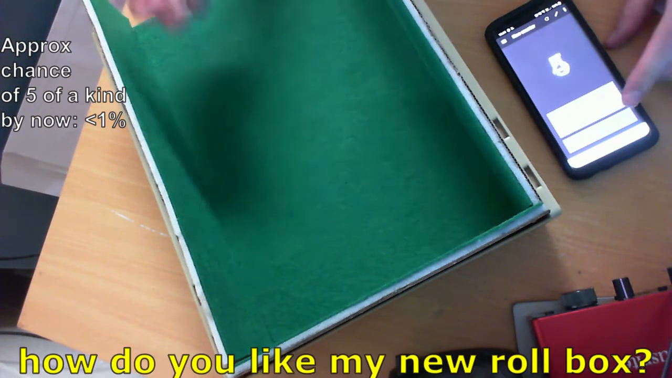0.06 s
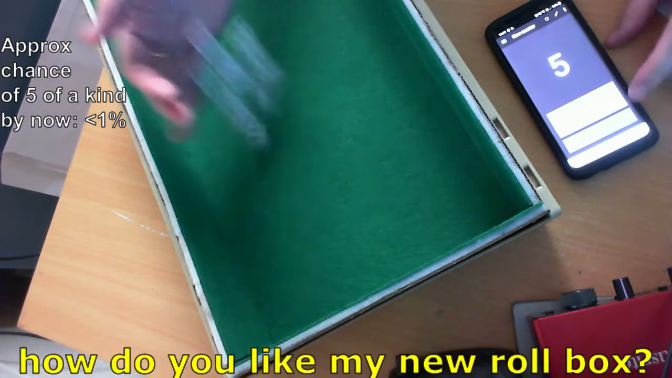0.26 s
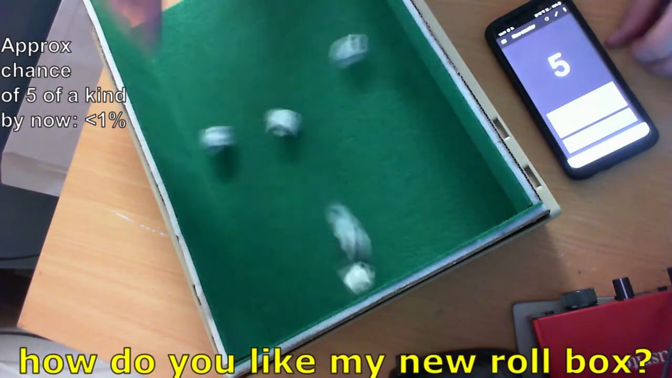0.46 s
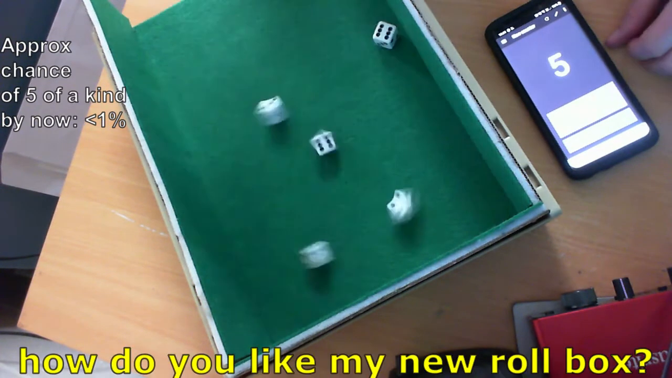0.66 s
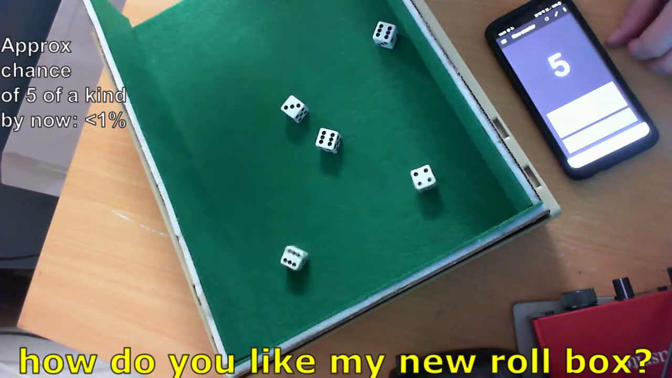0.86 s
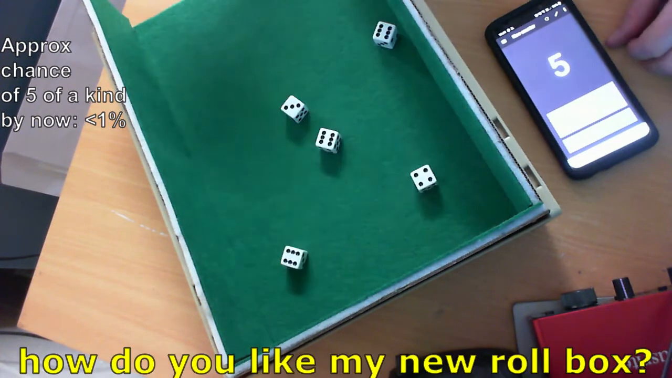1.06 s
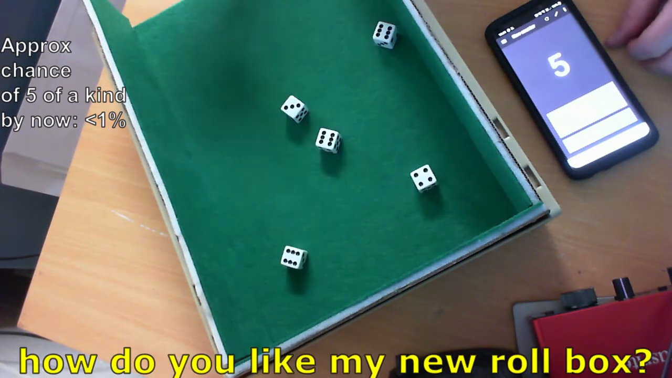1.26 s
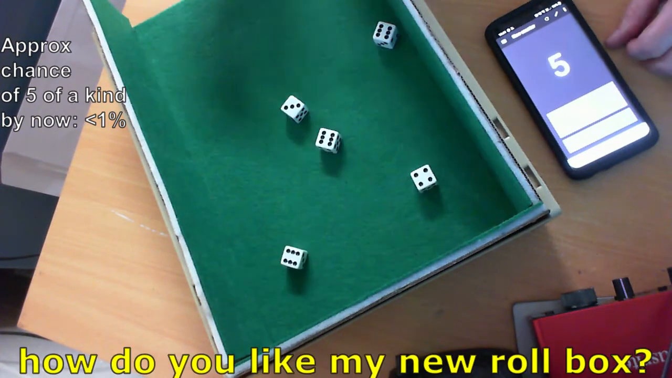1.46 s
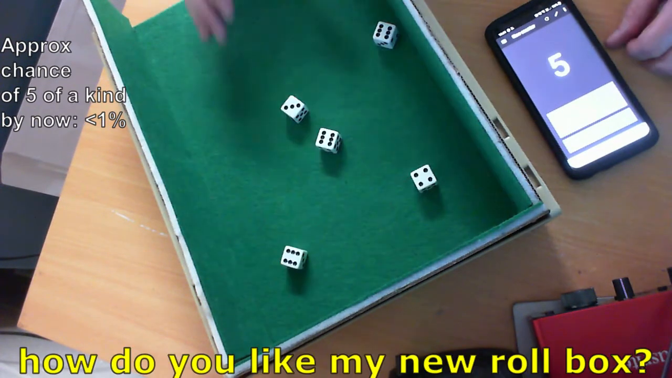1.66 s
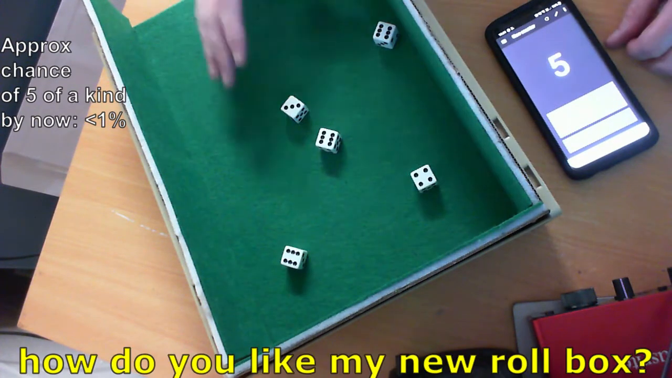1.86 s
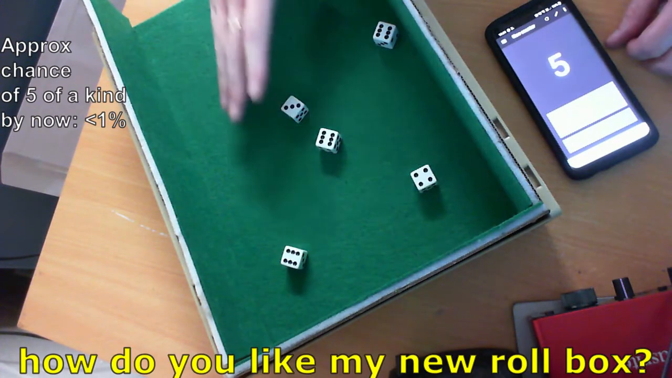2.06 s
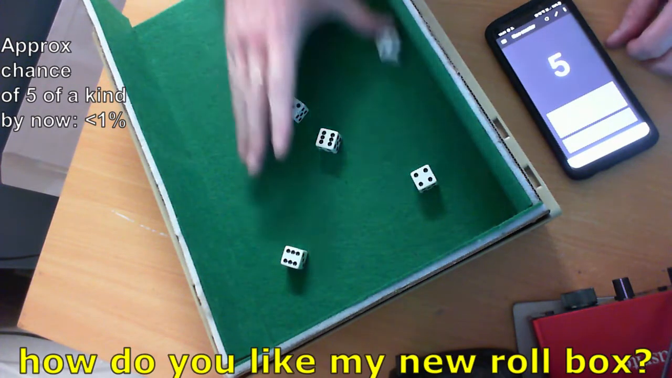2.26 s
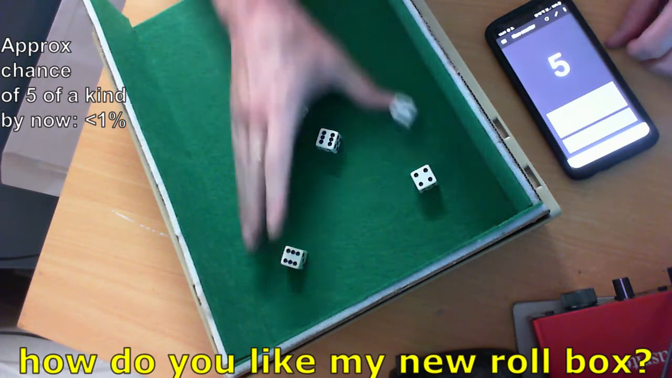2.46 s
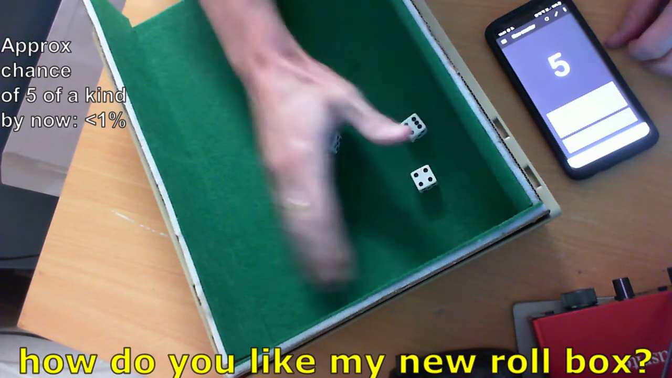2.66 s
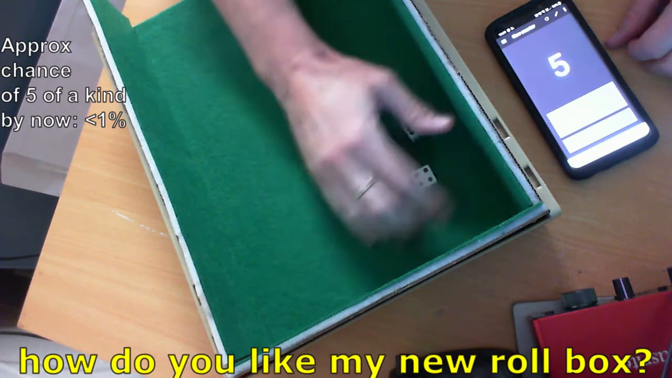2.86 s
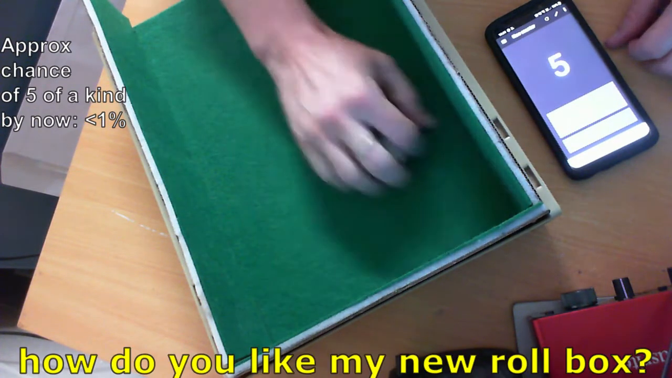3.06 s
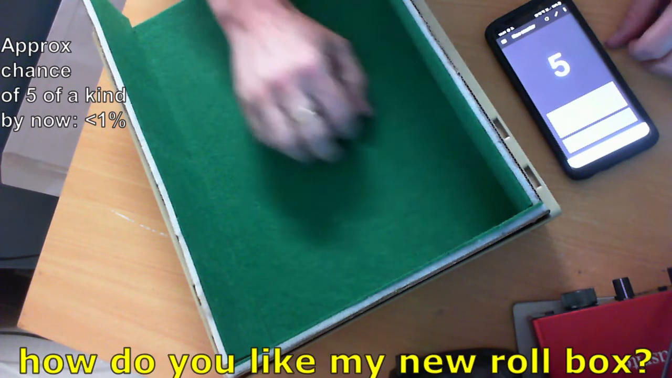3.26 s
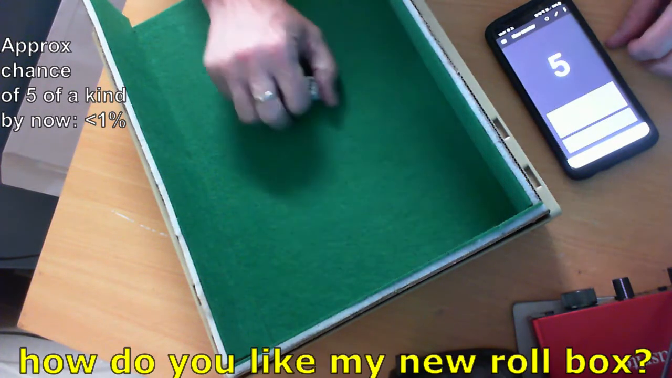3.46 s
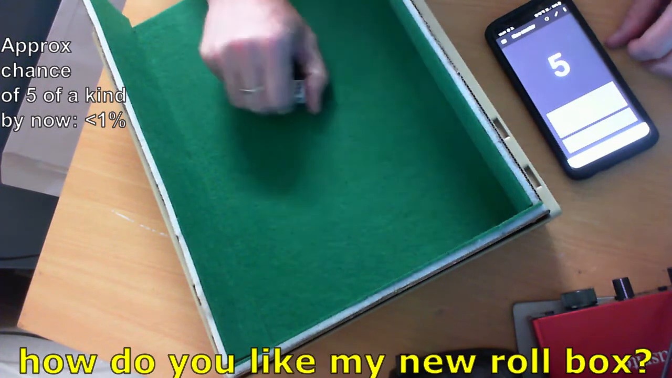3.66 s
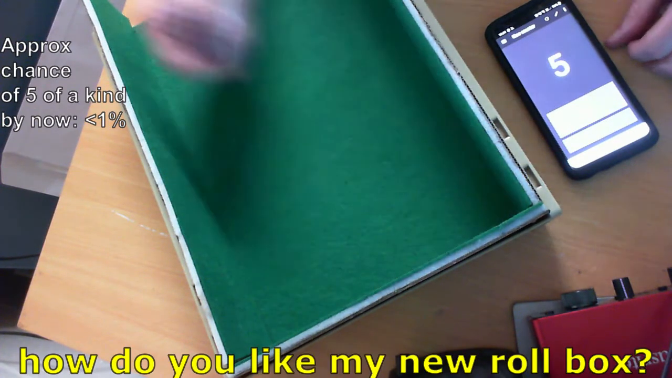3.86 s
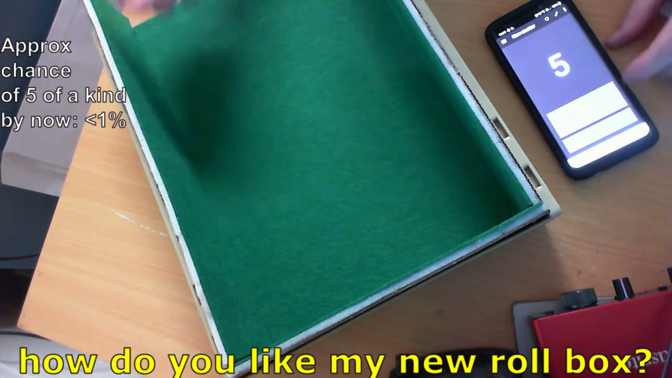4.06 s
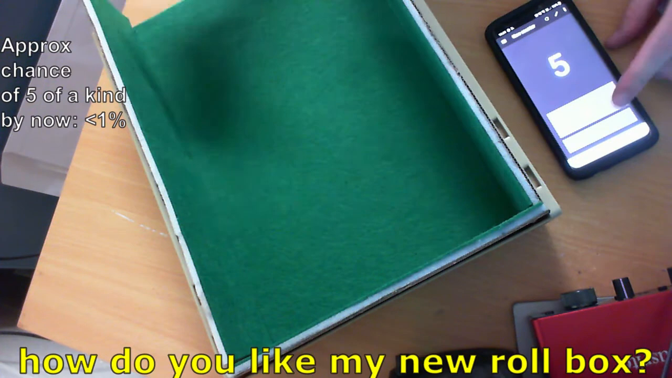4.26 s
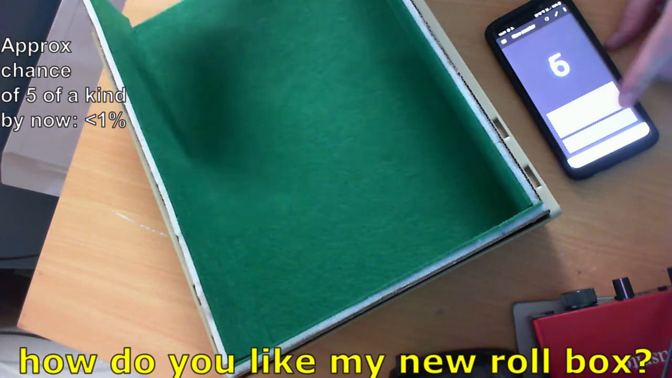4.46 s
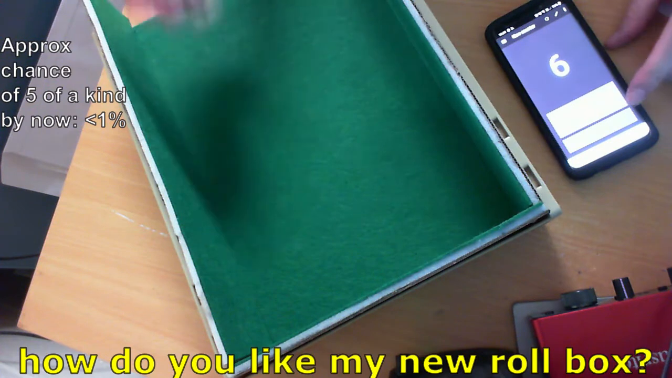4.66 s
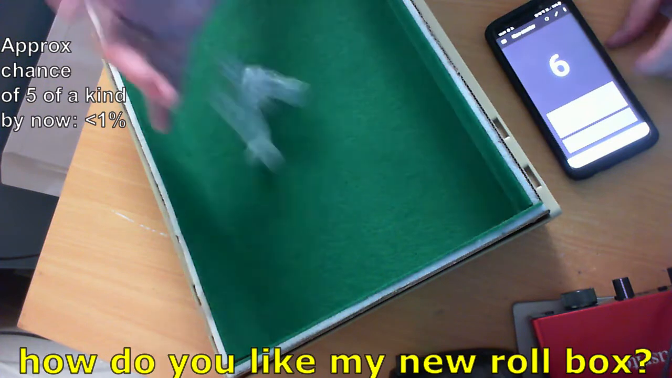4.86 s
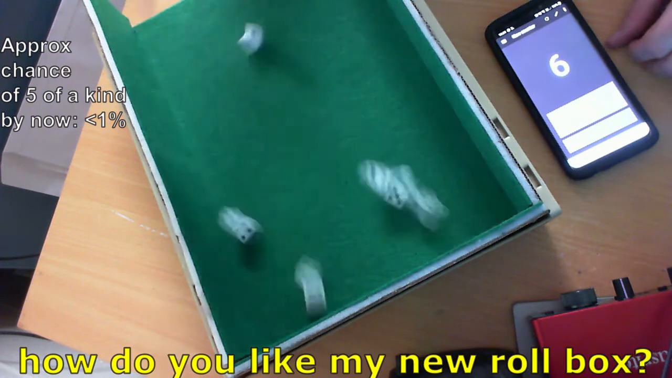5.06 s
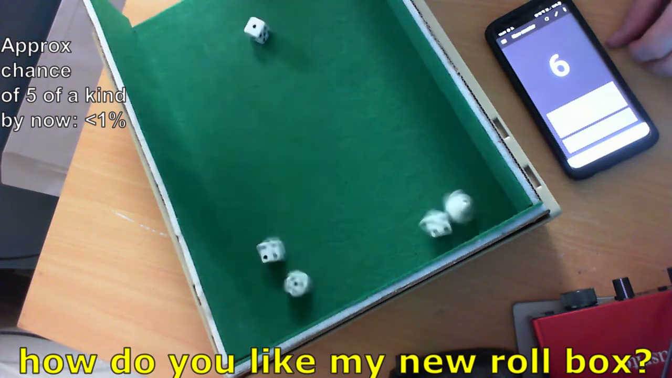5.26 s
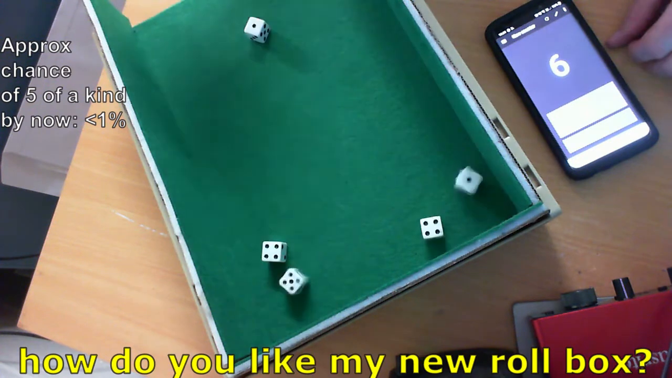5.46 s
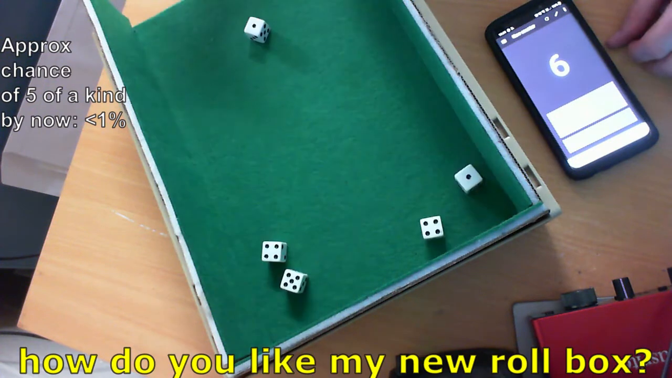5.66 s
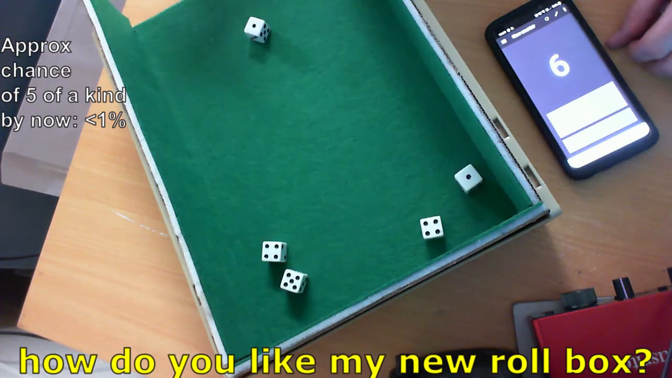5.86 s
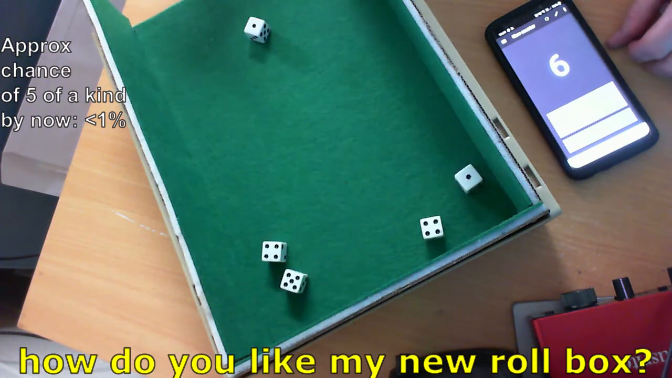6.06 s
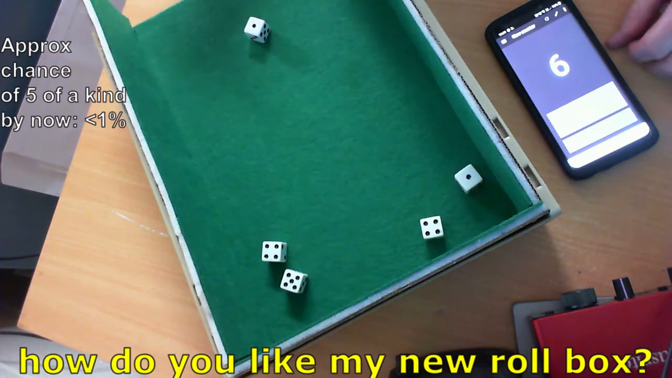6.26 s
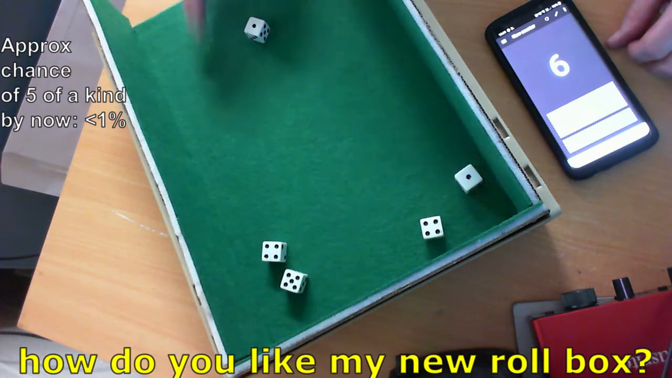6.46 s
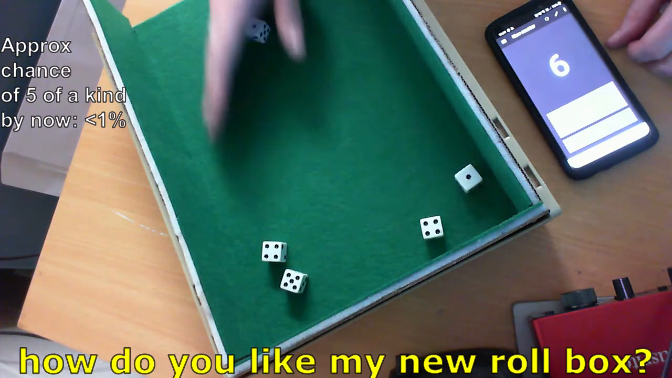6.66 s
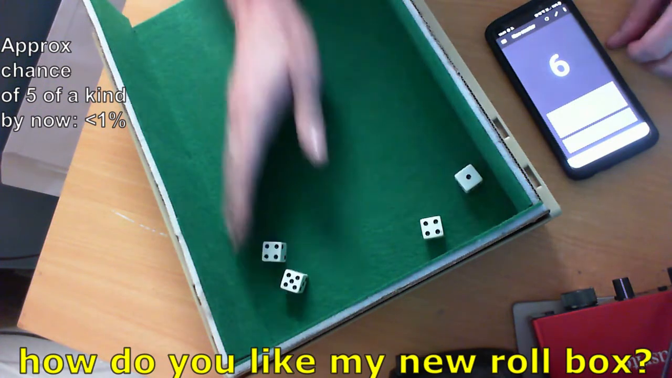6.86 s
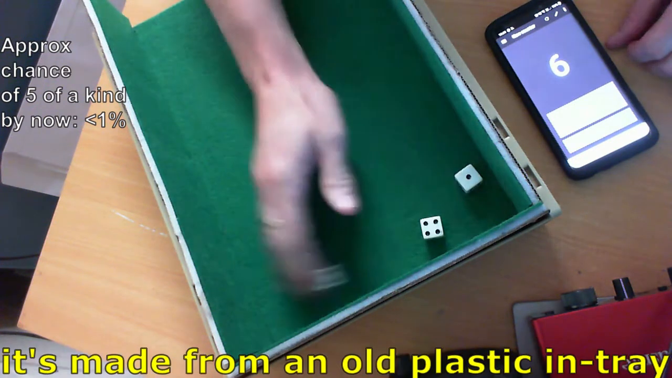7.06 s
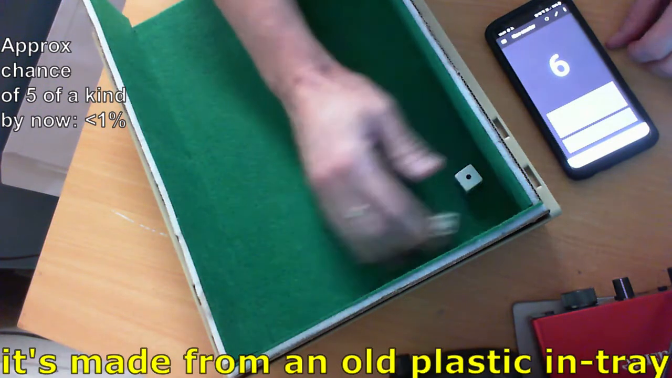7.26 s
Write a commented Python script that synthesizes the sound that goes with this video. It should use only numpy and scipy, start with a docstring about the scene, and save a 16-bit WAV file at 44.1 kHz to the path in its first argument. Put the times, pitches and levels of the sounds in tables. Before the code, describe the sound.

Close and dry at a desk: a sudden clatter of dice, bouncing knocks on a felt-covered plastic tray, then near quiet. Soft felt rubbing and light clicks follow as the dice are scooped up, then a quick rattle in the hand and a second clatter, tumbling to rest. Finally the hand slides over the felt again. Faint hiss, hum and a high pulsing electric whine run beneath, with slight room reflections.

```python
"""Plastic dice click together in a hand, are thrown twice into a felt-lined plastic tray and swept up again.
Close up, each click of a die is a tick and a short ring, with a small room answering after it.
Dice thud and tumble: knocks ring the tray's modes; hand and dice rub the felt as dense grains.
A faint rough whistle of narrow noise comes and goes. Under it all run a low hum, hiss and
steady tones, with a chopped electric whine from the recorder."""
import sys
import numpy as np
from scipy import signal
from scipy.fft import rfft, irfft, next_fast_len
from scipy.io import wavfile
from scipy.ndimage import uniform_filter1d

SR = 44100
rng = np.random.default_rng(int(sys.argv[2]) if len(sys.argv) > 2 else 0)


def persist_wave(psi):
    """Save psi, clipped to +-1, as 16-bit WAV."""
    counts = np.round(np.clip(psi, -1, 1) * 32767).astype(np.int16)
    wavfile.write(sys.argv[1], SR, np.atleast_2d(counts).T)


N = 323253
T = np.arange(N) / SR  # s

# resonances of the tray, low and upper: (f/Hz, level/dB, t60/s, held to at least 5 ms)
TRAY_BASS = [(111.2, -7, 0.7), (154, -17.5, .1), (210.4, -1.5, 0.076), (255.3, -6, 0.12), (296, -8, 0.086),
             (373.7, -4, 0.037)]
TRAY_MID = [(443, -3.5, 0.055), (475, -8.5, 0.069), (506, -6, 0.05), (585, -10.5, 0.076), (625, -9, 0.032),
            (731, -5.5, 0.099), (873, -1.5, .05), (976, 1, 0.039), (1141, 3.5, 0.033), (1251.4, 0.5, 0.038),
            (1387, 0.5, 0.036), (1513, 1.5, 0.027), (1657, -3, 0.042), (1860, -4.5, 0.021),
            (2154, -2, 0.0037), (2430, -8.5, 0.022), (2770, -9.5, 0.011)]
# colour of a die's edge scuffing the felt: (f/Hz, level/dB per Hz)
SCUFF_COLOUR = [(1200, -32), (2000, 13), (2800, -3.5), (4500, -13), (7000, -6), (10000, -24)]


def clicks(burst_s=0.00049, under_db=-13, gain_db=1.23, tick_db=-3, tick_s=0.00019):
    """Each collision is a broad tick and a millisecond of ringing in the die; the room answers each anew."""
    # die on die or on the tray wall: (t/s, level/dB before gain_db, ring f/Hz)
    hard_hits = [(0.0626, -41, 6100), (0.0725, -42, 5100), (0.102, -45, 5000), (0.1116, -33, 5200),
                 (0.1315, -26, 6000), (0.134, -33, 6100), (0.179, -23, 7500), (0.2535, -10, 7200),
                 (0.2599, -12, 6500), (0.2712, -15, 6800), (0.287, -33, 6300), (0.2983, -26, 6500),
                 (0.2998, -31, 6700), (0.313, -16, 6000), (0.4808, -15, 7000), (0.5112, -27, 6200),
                 (2.6661, -44, 5400), (2.6941, -51, 5600), (2.9466, -49, 7900), (2.9932, -45, 7400),
                 (3.0478, -36, 6800), (3.0571, -39, 6500), (3.0685, -38, 7100), (3.0869, -28, 7100),
                 (3.0956, -38, 6600), (3.1248, -21, 7500), (3.1445, -30, 7100), (3.2658, -27, 7100),
                 (3.2778, -34, 7200), (3.2878, -38, 6800), (3.3579, -38, 6000), (3.3747, -41, 6400),
                 (3.4144, -42, 6900), (3.4262, -42, 6300), (3.4351, -34, 6200), (3.437, -35, 6300),
                 (3.4782, -46, 6800), (3.8901, -42, 6000), (3.9962, -50, 5200), (4.009, -28, 5900),
                 (4.0296, -27, 6800), (4.0324, -20, 6200), (4.0375, -19, 5800), (4.0389, -24, 6500),
                 (4.0412, -23, 6400), (4.0423, -13, 6900), (4.0522, -18, 6700), (4.0562, -20, 7000),
                 (4.0604, -29, 6400), (4.0707, -28, 6500), (4.0774, -35, 5400), (4.1109, -44, 6000),
                 (4.1198, -38, 5500), (4.6944, -30, 5900), (4.728, -35, 6400), (4.7745, -33, 5900),
                 (4.7815, -28, 7000), (4.7857, -10, 6900), (4.7893, -16, 6800), (4.7914, -22, 7000),
                 (4.7949, -15, 6900), (4.8234, -16, 6900), (4.8678, -35, 5500), (4.8726, -36, 7400),
                 (4.8998, -37, 4500), (5.0113, -45, 5300), (5.2717, -35, 6200), (7.0198, -48, 6900),
                 (7.2105, -25, 7200)]
    # the softer the click, the more recoil and overtone beside the ring
    recoil_db, recoil_db_per_db = -30, 0.3133
    overtone_db, overtone_db_per_db = -25, 0.3585
    scatter_db = 5.5
    bright_db_per_khz, bright_hz = 4, 6990  # higher rings carry more overtone and tick
    die_cut_hz, die_top_hz = 1400, 13000

    out, t = np.zeros(N), T[:SR // 250]
    hits = [(*hit, 0) for hit in hard_hits] + rattle()
    shape = np.clip(t / 0.000091, 0, 1) * np.exp(-(t / burst_s) ** 3)
    rough = np.diff(rng.standard_normal((len(hits), len(t) + 1)))
    ticks = undb(tick_db) * uniform_filter1d(rough, size=3) * np.exp(-t / tick_s)
    scatter = scatter_db * rng.standard_normal((len(hits), 2))
    chances = rng.random((len(hits), 5))
    for (s, db, hz, dull_db), r, (low_db, high_db), tick in zip(hits, chances, scatter, ticks):
        bright = undb(bright_db_per_khz * (hz - bright_hz) / 1000)
        main = np.sin(2 * np.pi * hz * t)
        under = undb(under_db) * np.sin(2 * np.pi * (hz * (.65 + 0.064 * r[0]) * t + r[1]))
        over_gain = undb(overtone_db - overtone_db_per_db * db + high_db)
        over = over_gain * np.sin(2 * np.pi * ((9300 + 2200 * r[2]) * t + r[3]))
        # the whole die jumps back
        recoil_gain = undb(recoil_db - recoil_db_per_db * db + dull_db + low_db)
        recoil = recoil_gain * np.sin(2 * np.pi * (1900 + 1700 * r[4]) * t)
        ring = shape * (main + under + bright * over + recoil)
        add(out, s, room(undb(db + gain_db) * (ring + bright * tick)))
    # rounded corners dull the very top
    out = signal.sosfilt(signal.butter(2, die_top_hz, fs=SR, output="sos"), out)
    # the clicks keep no low thump
    return signal.sosfilt(signal.butter(3, die_cut_hz, "high", fs=SR, output="sos"), out)


def rattle():
    """Dice rattling together or on the tray wall: faint clicks scattered at random over each rattle."""
    # (start t/s, length/s, mean level/dB, f/Hz that each click raises 1.1 to 1.37 times, added recoil/dB)
    rattles = [(0.07, 0.013, -51, 5000, -0.5), (0.259, 0.0075, -46, 5000, -5),
               (0.256, 0.081, -34, 7030, -7), (3.05, 0.064, -42.5, 6850, 11.5),
               (3.35, 0.11, -47.5, 6300, 12), (4.02, 0.042, -34.5, 5800, -1), (4.073, .075, -49, 5400, 10),
               (4.849, .065, -40, 5160, 17)]
    r = rng.random((len(rattles), 7, 3))  # seven clicks in each
    return [(s + length * a, db + 8 * (b - .5), hz * (1.1 + 0.27 * c), dull_db)
            for (s, length, db, hz, dull_db), rows in zip(rattles, r)
            for a, b, c in rows]


def room(x):
    """An echo off the tray wall, quick ones from the desk, then a longer, weaker tail from the walls."""
    # colour of the tail, treble lifted by the microphone: (f/Hz, level/dB per Hz)
    tail_colour = [(1000, -33.5), (2500, -3.5), (4000, -4.5), (5500, -6.5), (7000, -8), (8500, -4),
                   (11000, -16.5), (15000, -30)]
    desk_db, desk_t60_s = -31, 0.032
    late_db, late_t60_s = -48.5, 0.34
    wall_s, wall_db = 0.0025, -16
    t = T[:SR // 4]
    fade = undb(desk_db - 60 * t / desk_t60_s) + undb(late_db - 60 * t / late_t60_s)
    answer = unit(colour(rng.standard_normal(len(t)), tail_colour)) * fade * np.clip(t / 0.0012, 0, 1)
    answer[0] = 1  # the direct sound
    answer[int(SR * wall_s * rng.uniform(.8, 1.2))] += undb(wall_db)
    return signal.fftconvolve(x, answer)


def thuds(reach=0.39, scatter_db=3, mid_db=-6, bass_db=-7, deep_db=-8, scuff_db=-28, skid_s=0.0028, scuff_s=0.0089):
    """A die knocks on the felt, dropped or dragged, with a brief skid: modes near the spot ring most."""
    # die or finger on tray: (t/s, level/dB, f/Hz of the modes nearest the spot, bass modes over that level/dB);
    # each part's own dB setting is added
    knocks = [(0.243, -22.5, 1010, -1.5), (0.252, -16.5, 560, -0.5), (0.26, -24.5, 1110, 4.5),
              (0.275, -25, 606, -17), (0.285, -23, 456, -16), (0.304, -18.5, 480, -3.5),
              (0.314, -19.5, 716, -35), (0.329, -23.5, 1040, -15), (0.358, -33, 1500, -0.5),
              (0.375, -27, 480, -4.5), (0.411, -36, 1180, -12), (0.423, -30.5, 1040, -16),
              (0.438, -39.5, 620, -13), (0.465, -35.5, 1050, -8), (0.483, -34, 1000, -26),
              (0.528, -46.5, 729, 3.5), (0.573, -39, 710, -5), (0.615, -30, 755, -14), (0.649, -55, 736, 6),
              (0.7, -38, 1100, -5.5), (0.743, -38, 845, -5.5), (0.781, -40, 990, -11),
              (0.811, -48, 1310, -12), (1.385, -55, 1300, -26), (2.081, -43, 1270, -37),
              (2.273, -42.5, 1460, -35), (2.36, -44, 990, -32), (3.055, -43, 1510, -19),
              (3.084, -34.5, 1540, -23.5), (3.125, -40, 1560, -28), (3.18, -42, 1480, -22),
              (3.439, -41.5, 1350, -31), (4.39, -56.5, 1180, -25), (4.785, -13.5, 1260, -15),
              (4.797, -19, 785, -4.5), (4.807, -20, 465, -16.5), (4.819, -32, 715, 0),
              (4.842, -25.5, 713, -2), (4.854, -20.5, 503, -2), (4.864, -14.5, 500, -18),
              (4.881, -15.5, 634, -3.5), (4.9, -13.5, 614, -11), (4.91, -20, 690, -14),
              (4.931, -32.5, 750, -19.5), (4.958, -27.5, 1320, -14), (4.978, -17.5, 1310, -13.5),
              (4.994, -27, 552, -4), (5.011, -35.5, 780, -10.5), (5.043, -25.5, 1270, -19),
              (5.061, -30, 1540, -19.5), (5.087, -30, 694, -13), (5.108, -33, 1310, -3),
              (5.137, -32, 820, -14), (5.151, -29, 820, -11), (5.197, -36.5, 980, -27),
              (5.238, -35, 1546, -3), (5.289, -39, 1160, -16), (5.333, -43.5, 960, -16),
              (5.378, -56, 1182, -24), (5.398, -30.5, 1240, -20), (5.454, -51, 1158, 1),
              (6.384, -53, 1150, -26), (6.755, -36, 1080, -30), (7.21, -49, 1550, -6)]
    out, bass, mid = np.zeros(N), rings(TRAY_BASS), rings(TRAY_MID)
    octaves, t = np.log2(np.array(TRAY_MID)[:, 0]), T[:SR // 25]
    skids = rng.standard_normal((len(knocks), len(t)))
    chances = rng.standard_normal((len(knocks), len(bass) + len(mid)))
    for (s, db, hz, low_db), r, skid in zip(knocks, chances, skids):
        g = np.sign(r) * undb(scatter_db * np.abs(r))  # uneven mode strengths
        near = np.exp(-((octaves - np.log2(hz)) / reach) ** 2) + 0.28
        knock = signal.fftconvolve((g[len(bass):] * near) @ mid, skid * np.exp(-t / skid_s))
        add(out, s, undb(db + mid_db) * knock / np.abs(knock).max())
        boom = g[1:len(bass)] @ bass[1:] + undb(deep_db) * g[0] * bass[0]
        add(out, s, undb(db + low_db + bass_db) * boom)
        scuff = unit(colour(skid, SCUFF_COLOUR)) * np.exp(-t / scuff_s)
        add(out, s, undb(db + scuff_db) * scuff)
    return out


def tumble():
    """Corners and edges patter on the felt while the dice roll."""
    # dice landing and rolling on: (landing t/s, rolling/s, strength/dB, scuff of edges over it/dB)
    rolls = [(0.25, 0.609, -42, -24), (4.785, .05, -42.5, -16.5), (4.849, 0.644, -41.5, -24)]
    land_s, settle_s = .03, 0.082
    # rolling slows down: each part's start over the throw (dB) and fade (dB per s)
    patter_part, boom_part, deep_part = (-10.5, 23), (-2, 34.4), (-4, 24)
    scuff_fade = 70.5  # dB per s

    def fading(s, length, db, fade_db):
        """A swell that also loses fade_db a second from its start."""
        return swell(s, length, land_s, settle_s) * undb(db - fade_db * np.clip(T - s, 0, None))

    patter, boom, deep = (sum(fading(s, length, db + over_db, fade_db) for s, length, db, _ in rolls)
                          for over_db, fade_db in (patter_part, boom_part, deep_part))
    scuff = sum(fading(s, length, db + edge_db, scuff_fade) for s, length, db, edge_db in rolls)
    knocks, corners = grains(300, 3.6), grains(700, 2.5)
    upper = patter * tray(corners, TRAY_MID) + scuff * unit(colour(corners, SCUFF_COLOUR))
    return upper + boom * tray(knocks, TRAY_BASS[1:]) + deep * tray(knocks, TRAY_BASS[:1])


def rub():
    """Fibres catch and let go: dense knocks into the tray, a rasp and a patchy hiss."""
    # hand and dice sliding on felt: (start t/s, length/s, scrape level/dB, then over the scrape:
    # rasp/dB, hiss/dB, weight on the tray floor/dB)
    strokes = [(1.914, 0.063, -59.5, -14, -9, -4.5), (2.006, 0.11, -66, -9.5, -9.5, -2),
               (2.169, .07, -73, -0.5, -10, -28), (2.257, .05, -60.5, -14, -19, -24),
               (2.319, 0.084, -59.5, -7.5, -11, -18), (2.437, 0.23, -61, -12.5, -12, -14),
               (2.7, .17, -63, -8, -11.5, -14), (2.894, 0.14, -60, -10, -14, -16),
               (3.034, .13, -56.5, -17, -10.5, -18), (3.179, .27, -59.5, -9.5, -7, -6),
               (3.458, 0.055, -65, -8, -5, -15), (3.569, 0.079, -65.5, -8, -7.5, -23),
               (3.873, 0.063, -80.5, 3, 5.5, -6), (6.255, 0.071, -79.5, -10, 3, -5),
               (6.471, 0.029, -56.5, -9.5, -10.5, -20), (6.516, 0.2, -58, -16, -13, -18),
               (6.723, .12, -56.5, -11.5, -13.5, -14), (6.851, 0.34, -59, -12.5, -12.5, -13),
               (7.197, .2, -64, -8.5, -21, -1.5)]
    # duller rasp of skin on felt: (f/Hz, level/dB per Hz)
    skin_colour = [(1400, -9.5), (2100, 2), (2600, 0), (3300, -1), (4500, -24.5)]
    # felt hiss, treble lifted by the microphone: (f/Hz, level/dB per Hz)
    felt_colour = [(2500, -8.5), (4000, 3), (5200, 1), (7000, 3), (9000, -6.5), (12000, -47.5)]
    attack_s, release_s = 0.019, 0.057
    upper_db = -2  # share of the upper tray modes
    scrape, rasp, hiss, weight = sum(
        swell(s, length, attack_s, release_s) * undb(db + np.array([0, *over]))[:, None]
        for s, length, db, *over in strokes)
    upper = np.clip(undb(upper_db + 1. * walk(12)), 0, .92)
    knocks = grains(1500, 1.0)
    ring = np.sqrt(1 - upper ** 2) * slid(knocks, TRAY_MID[5:9]) + upper * slid(knocks, TRAY_MID[9:])
    skin = unit(colour(grains(2500, 1.8), skin_colour)) * undb(3.7 * walk(30))
    fibres = unit(colour(grains(7700, 1.1), felt_colour)) * undb(2.1 * walk(25))
    felt = scrape * undb(1.7 * walk(18)) * ring + rasp * skin + hiss * fibres
    felt *= undb(1.3 * walk(40))
    pressed = tray(grains(800, 6.2), TRAY_BASS + TRAY_MID[:5])
    return felt + weight * undb(3.4 * walk(14)) * pressed


def whistle():
    """A faint rough whistle: noise in one narrow resonance, fluttering."""
    # (start t/s, length/s, level/dB)
    whistles = [(1.683, 0.18, -72), (3.958, .04, -73), (4.122, 0.056, -72), (6.473, .17, -72.5)]
    peak_hz, width_hz = 4990, 170  # width of each of two passes
    attack_s, release_s = 0.017, 0.067
    b, a = signal.iirpeak(peak_hz, peak_hz / width_hz, SR)
    once = signal.lfilter(b, a, rng.standard_normal(N))
    ring = unit(signal.lfilter(b, a, once))
    level = sum(swell(s, length, attack_s, release_s) * undb(db) for s, length, db in whistles)
    return level * undb(3.7 * walk(60)) * ring


def floor():
    """Background: coloured noise that swells a little as hiss, and a sine wavering in pitch and level as hum."""
    # colour of the hiss: (f/Hz, level/dB per Hz)
    hiss_colour = [(15, -6.5), (30, -9), (60, -16), (99, -9.5), (150, -17.5), (500, -23), (1300, -27),
                   (2500, -33), (6000, -34.5), (10500, -34.5), (13500, -38.5), (15500, -31)]
    hiss_db, hum_hz, hum_db = -67.5, 123, -71.5  # rms levels before their drift
    drift = undb(.8 * walk(1.6))
    hiss = unit(colour(rng.standard_normal(N), hiss_colour)) * undb(hiss_db) * drift
    phase = 2 * np.pi * np.cumsum(hum_hz + 0.59 * walk(3.1)) / SR
    return hiss + np.sqrt(2) * undb(hum_db + 1.8 * walk(19)) * np.sin(phase)


def whine():
    """A tone leaks from the electronics, stepping down, pausing and stepping up 15 times a second."""
    # thin steady electric tones: (f/Hz, rms level/dB)
    tones = [(4936, -95), (6584, -97), (8000, -94), (9652, -97), (9884, -98), (14352, -96)]
    whine_hz, whine_db = 13171, -57  # rms while full on
    every_s, start_s = .066663, .0396
    gap_s, edge_s, edge_db = .0115, .003, -13  # the edges lie inside the gap
    before = -(T - start_s) % every_s  # time left until the gap ends
    at_edge = np.abs(before - gap_s / 2) > gap_s / 2 - edge_s
    on = np.where(before > gap_s, 1, undb(edge_db) * at_edge)
    chopped = undb(whine_db) * uniform_filter1d(on, size=50) * np.sin(2 * np.pi * whine_hz * T)
    thin = sum(undb(db) * np.sin(2 * np.pi * hz * T) for hz, db in tones)
    return np.sqrt(2) * (chopped + thin)


def tray(x, modes):
    """Knocks ring the tray; neighbouring modes move in opposite senses."""
    return unit(signal.oaconvolve(x, (-1.) ** np.arange(len(modes)) @ rings(modes))[:N])


def slid(x, modes):
    """Knocks from a moving spot: each mode swells and fades as the hand moves over the floor."""
    shift_db, shift_per_s = 4, 6
    return unit(sum(undb(shift_db * walk(shift_per_s)) * signal.oaconvolve(x, (-1.) ** k * ring)[:N]
                    for k, ring in enumerate(rings(modes))))


def rings(modes):
    """Each mode's fading sine after one blow, one row a mode, a quarter second long."""
    hz, db, t60 = np.array(modes).T[:, :, None]
    t = T[:SR // 4]
    return undb(db) * np.sin(2 * np.pi * hz * t) * np.exp(-np.log(1000) * t / np.clip(t60, .005, 1))


def grains(per_s, spread_db):
    """Random tiny knocks of uneven size and sign, none above three and a half spreads."""
    hit = rng.random(N) < per_s / SR
    size = undb(spread_db * np.minimum(rng.exponential(size=N), 3.5))
    return hit * rng.choice([-1, 1], N) * size


def swell(s, length, attack, release):
    """Gain that rises from s, holds until s + length and dies away 20 dB per release."""
    fall = np.exp(-np.clip(T - s - length, 0, None) * np.log(1000) / (3 * release))
    return np.clip((T - s) / attack, 0, 1) * fall


def walk(rate):
    """Straight ramps between random levels, rate of them a second; rms about two thirds."""
    k = int(SR / rate)
    return 0.81 * uniform_filter1d(np.repeat(rng.standard_normal(N // k + 1), k), k)[:N]


def colour(x, points):
    """Shape a sound's spectrum by (Hz, dB) points."""
    size = next_fast_len(len(x))
    hz, db = np.transpose(points)
    gain = undb(np.interp(np.log(np.fft.rfftfreq(size, 1 / SR) + 1), np.log(hz), db))
    return irfft(rfft(x, size) * gain, size)[:len(x)]


def undb(db):
    """Amplitude ratio of a level in dB."""
    return 10 ** (np.asarray(db) / 20)


def unit(x):
    """Scale a sound to an rms of one."""
    return x / np.sqrt(np.mean(x ** 2))


def add(out, s, x):
    """Mix x into out from s seconds."""
    i = int(s * SR)
    out[i:i + len(x)] += x[:N - i]


def scene():
    """Clicks, everything that sounds the tray and felt, the whistle and the background, in mono."""
    # the microphone thins the deep bass of the tray sounds
    bass_cut = signal.butter(2, 87, "high", fs=SR, output="sos")  # Hz
    table = signal.sosfilt(bass_cut, thuds() + tumble() + rub())
    return (clicks() + table + whistle() + floor())[None]


def record(dry):
    """The recorder rounds the loudest peaks, adds its whine and a small offset, and cuts the top."""
    headroom, offset, top_hz = .5, -.0041, 15700
    wet = headroom * np.tanh(dry / headroom) + whine() + offset
    return signal.sosfilt(signal.ellip(10, .2, 70, top_hz, fs=SR, output="sos"), wet)


dry = scene()
out = record(dry)
persist_wave(out)
```